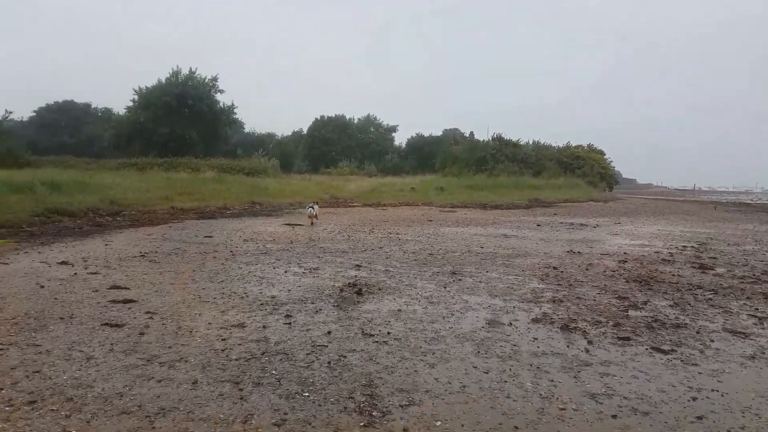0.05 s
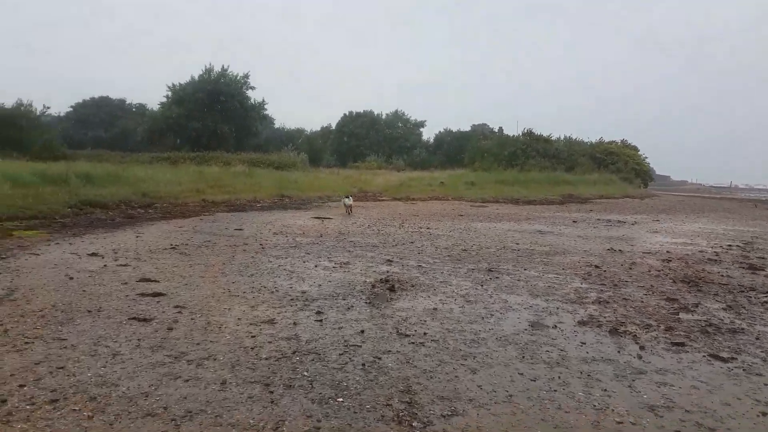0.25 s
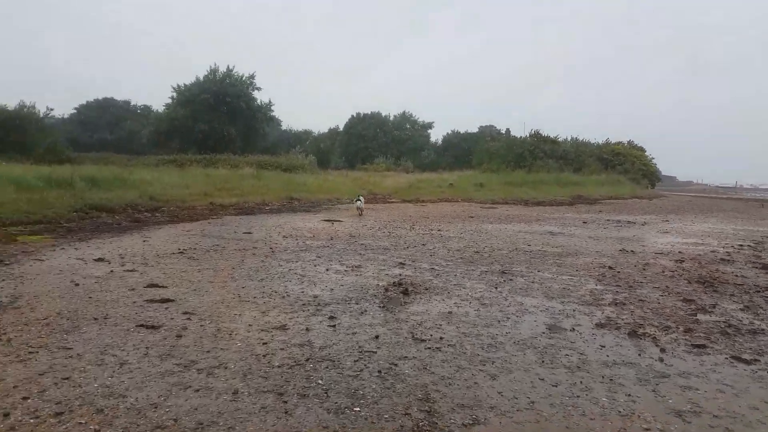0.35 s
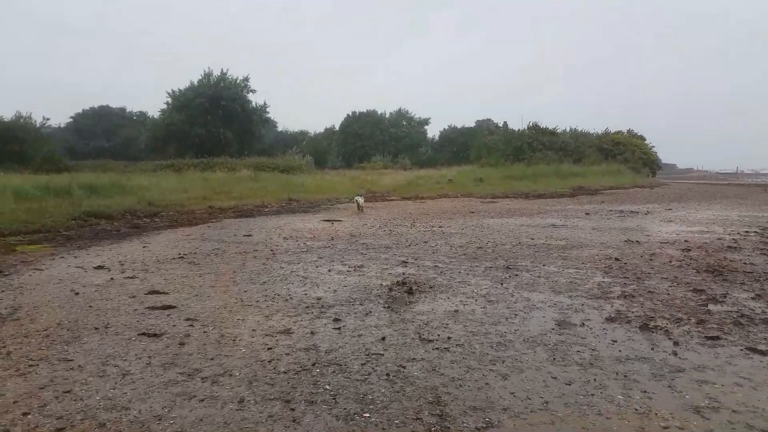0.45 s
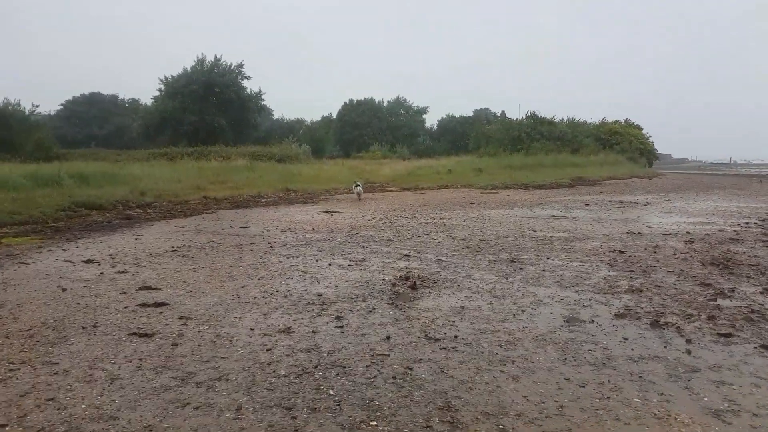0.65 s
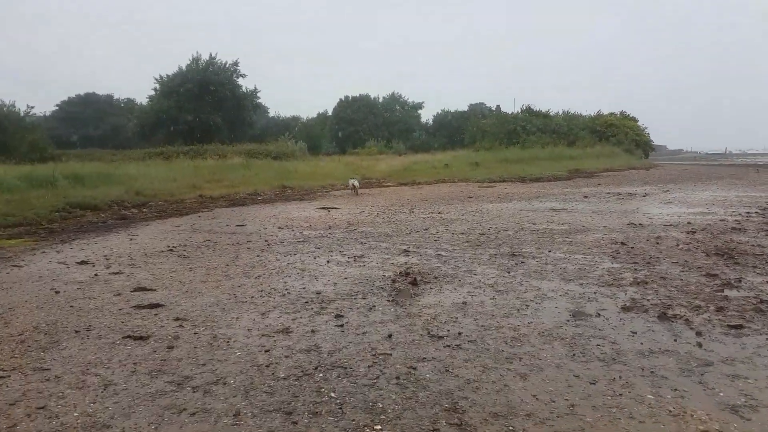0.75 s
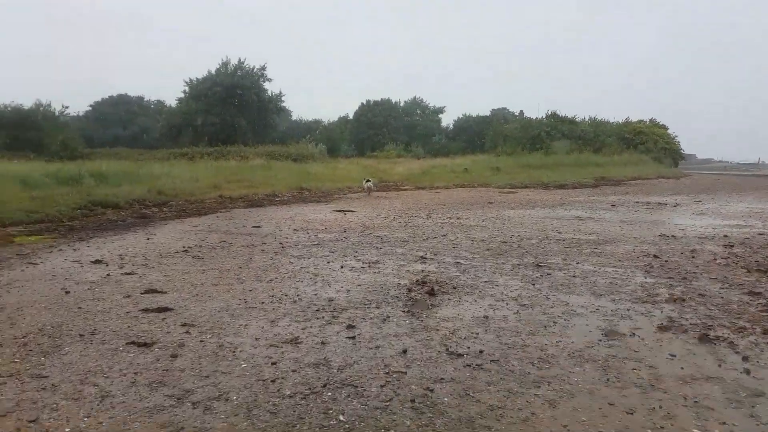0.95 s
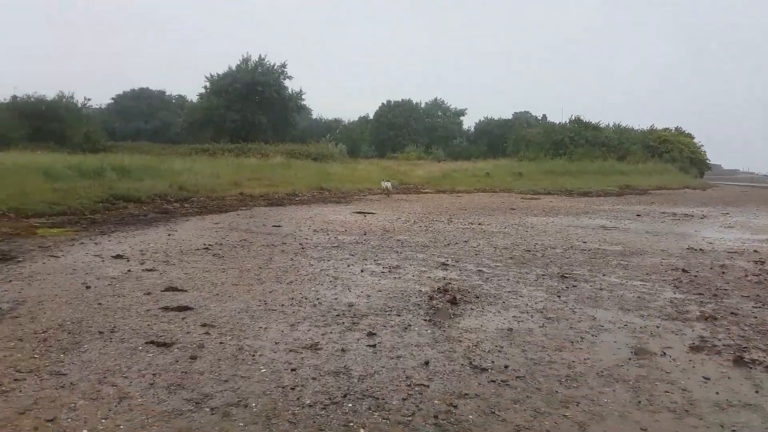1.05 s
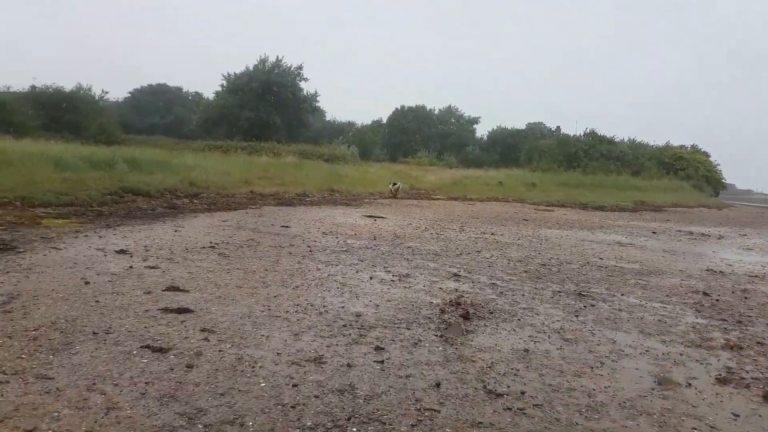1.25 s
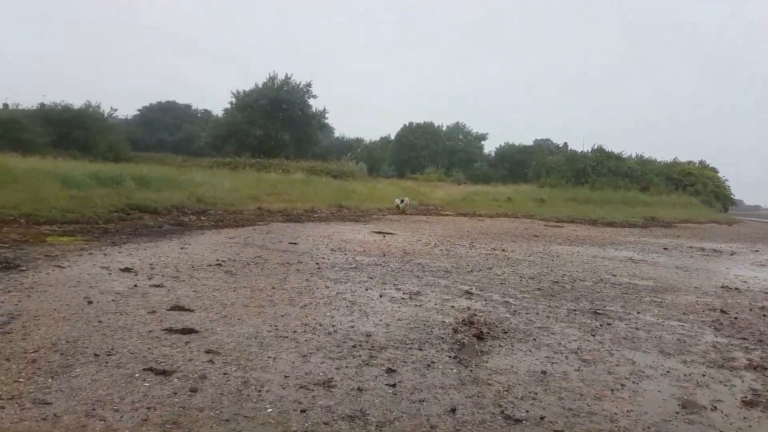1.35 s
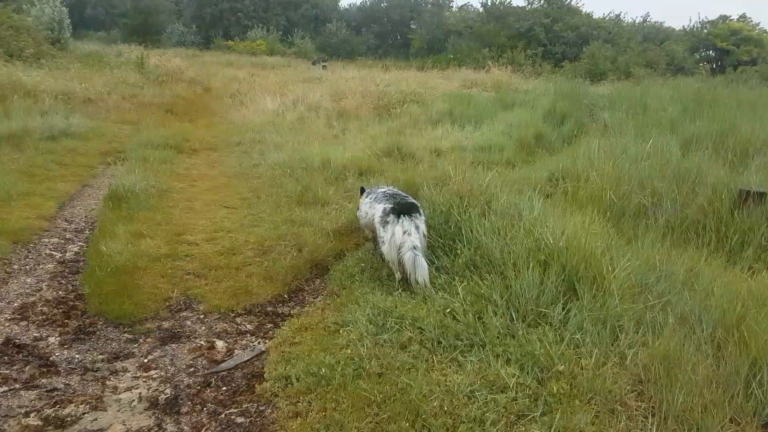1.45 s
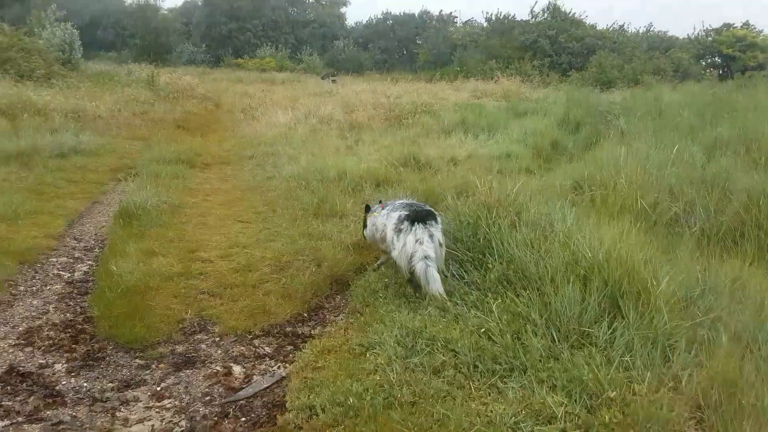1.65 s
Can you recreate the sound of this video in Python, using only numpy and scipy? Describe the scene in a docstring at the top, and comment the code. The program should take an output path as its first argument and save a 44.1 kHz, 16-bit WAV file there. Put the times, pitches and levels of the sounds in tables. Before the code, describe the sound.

Three footsteps crunch on wet, pebbly sand close to the microphone, the first loudest with a sharp stone clack. A hiss swells between the first two. Drops tick and light wind rumbles over the open shore's distant wash.

```python
"""Three footsteps crunch on wet, pebbly sand, close to a hand-held microphone on an open shore. Each step is a
run of short presses that set the sole, pebbles, small stones and wet grit ringing; single stones clack, hardest
in the first step. Drops tick nearby over a fine patter and a distant wash. A hiss swells and fizzes between the
first two steps. Light wind rumbles on the microphone, taps and buffets it; after the last step the low
background drops away abruptly as a short click sounds."""
import sys
import numpy as np
from scipy import signal
from scipy.io import wavfile

SR = 44100
rng = np.random.default_rng(int(sys.argv[2]) if len(sys.argv) > 2 else 0)


def generate_wav(signal):
    """Clip the signal to [-1, 1] and save it as 16-bit WAV at the path in sys.argv[1]."""
    frames = np.transpose(np.atleast_2d(signal))
    scaled = np.clip(frames, -1, 1) * 32767
    pcm = np.round(scaled).astype(np.int16)
    wavfile.write(sys.argv[1], SR, pcm)


N = 74970

# resonances of the ground, coarse to fine: (pitch [Hz], width [Hz], level [dB])
PEBBLE_MODES = [(796, 283, 0.004), (1252, 403, 0)]
STONE_MODES = [(1680, 1090, 0.5), (2750, 595, 4.5), (3510, 1170, -4), (4930, 1370, -5)]
GRIT_MODES = [(6430, 1400, -4.5), (9100, 280, 0.5), (11500, 6800, -7.5), (15500, 2000, -13)]


def from_db(db):
    """Decibels to gain."""
    return 10 ** (np.asarray(db) / 20)


def rms_one(x):
    """Scale to rms 1."""
    return x / np.sqrt(np.mean(x ** 2) + 1e-20)


def panned(db):
    """Stereo gains with the left louder by db."""
    return from_db(np.array([[db / 2], [-db / 2]]))


def level_curve(rows):
    """Gain over time from (time [s], level [dB]) points."""
    return from_db(np.interp(np.arange(N) / SR, *np.transpose(rows)))


def at_hz(rows, hz):
    """The columns of a table read at one frequency."""
    freqs, *columns = np.transpose(rows)
    return [np.interp(np.log(hz), np.log(freqs), c) for c in columns]


def drift(per_s):
    """A random wander through per_s points a second."""
    knots = rng.standard_normal(1000)
    return np.interp(np.arange(N) / SR * per_s, np.arange(len(knots)), knots)


def resonate(x, modes):
    """Ring parallel resonances with alternating signs."""
    out = 0
    for k, (hz, width, db) in enumerate(modes):
        r, w = np.exp(-np.pi * width / SR), 2 * np.pi * hz / SR
        ring = signal.lfilter([1, 0, -1], [1, -2 * r * np.cos(w), r * r], x + 1e-18)
        out = out + (-1) ** k * from_db(db) * (1 - r * r) / 2 * ring
    return out


def low_cut(x, hz):
    """Roll off the lows below hz."""
    return signal.sosfilt(signal.butter(4, hz, "high", fs=SR, output="sos"), x)


def grains(shape, per_s, spread_db=2.5):
    """Random clicks, many small and a few large."""
    sizes = from_db(spread_db * np.minimum(rng.exponential(1, shape), 4)) * rng.choice([-1, 1], shape)
    return sizes * (rng.random(shape) < per_s / SR)


def shower(hold_s, modes, cut_hz, width, per_s=6000):
    """Tiny contacts ring a body under a press-and-release envelope; width sets the stereo spread."""
    attack_s, decay_s = 0.0016, 0.0058
    t = np.arange(SR // 12) / SR
    press = np.minimum(t / attack_s, 1) * np.exp(-np.maximum(t - hold_s, 0) / decay_s)
    mid, side = low_cut(resonate(press * grains((2, len(t)), per_s), modes), cut_hz)
    return np.sqrt(np.mean(press ** 2)) * (rms_one(mid) + width * rms_one(side) * [[1], [-1]])


def banded_noise(spectrum, stereo, flicker_db, flicker_per_s):
    """Third-octave noise bands, each with its own level, flicker, stereo likeness and pan; rms 1."""
    out, edges = 0, np.geomspace(20, 17000, 30)
    white = rng.standard_normal((2, 2, N))
    shared_flicker = drift(flicker_per_s)
    for k, (low, high) in enumerate(zip(edges, edges[1:])):
        band = signal.butter(2, [low, high], "band", fs=SR, output="sos")
        mid, side = signal.sosfilt(band, white[k % 2])
        hz = np.sqrt(low * high)
        alike, pan_db = at_hz(stereo, hz)
        gain = from_db(at_hz(spectrum, hz)[0] + flicker_db * (shared_flicker + drift(flicker_per_s)))
        pair = np.sqrt(1 + alike) * mid + np.sqrt(1 - alike) * side * [[1], [-1]]
        out = out + gain * panned(pan_db) * pair
    return rms_one(out)


def add(out, s, sound):
    """Mix a short sound in at time s."""
    i = int(np.clip(s * SR, 0, N - 1))
    out[:, i:i + sound.shape[1]] += sound[:, :N - i]


def shore_wash():
    """The distant shore lays a steady bed of soft noise."""
    spectrum = [(40, -12.5), (800, -4.5), (1750, -3.5), (2400, -10.5), (3400, -7.5), (5000, -25),
                (8000, -28), (16000, -24)]  # tone: (frequency [Hz], relative density [dB])
    stereo = [(650, 0.86, -1), (1320, 0.0076, 0.5), (2100, 0, 14.5), (4360, 0, -1)]  # image: (frequency [Hz], likeness [0-1], left over right [dB])
    return from_db(-54.5) * banded_noise(spectrum, stereo, flicker_db=1.0, flicker_per_s=130)


def hiss():
    """A swishing hiss with fine crackle in it swells after the first step."""
    swell = [(0, -55.5), (.33, -56.5), (.41, -44), (.48, -48.5), (.70, -47.5), (.78, -54), (.96, -49.5),
             (1.08, -57.5), (1.44, -56.5), (1.5, -58), (1.7, -65)]  # envelope: (time [s], level [dB])
    spectrum = [(300, -12.5), (700, -2.5), (1200, -2.5), (1750, 3.5), (2600, -4.5), (4000, -5.5),
                (6000, -14), (7800, -52), (9400, -13), (15500, -24)]  # tone: (frequency [Hz], relative density [dB])
    stereo = [(600, 1, 0.33), (1460, 0.69, 5.8), (2920, 0.045, 6.2), (8000, 0.077, 2.2),
              (15000, 0.072, 11.6)]  # image: (frequency [Hz], likeness [0-1], left over right [dB])
    swish = banded_noise(spectrum, stereo, flicker_db=1.5, flicker_per_s=130)
    crackle = resonate(grains((2, N), per_s=640, spread_db=5), STONE_MODES + GRIT_MODES)
    return level_curve(swell) * (swish + from_db(-9.5) * rms_one(crackle))


def wind():
    """Wind on the microphone makes a lumpy rumble; near the end the low background drops away abruptly."""
    gusts = [(0, -52), (.2, -57), (.29, -52), (.7, -50), (.8, -56), (.89, -48), (.97, -54.5), (1.05, -48.5),
             (1.2, -50.5), (1.465, -46), (1.49, -70)]  # envelope: (time [s], level [dB])
    spectrum = [(25, -24), (55, 1), (90, -0.5), (160, -3.5), (300, -7), (600, -14.5), (4000, -76)]  # tone: (frequency [Hz], relative density [dB])
    stereo = [(60, 0.074, 10.1), (300, 0.11, 8.8)]  # image: (frequency [Hz], likeness [0-1], left over right [dB])
    return level_curve(gusts) * banded_noise(spectrum, stereo, flicker_db=1.45, flicker_per_s=66)


def crunches():
    """Each press sets off showers of contacts in sole, pebbles, stones and grit; light steps are duller."""
    # the sole presses down: (time [s], hold [s], thud [dB], pebbles [dB], stones [dB], grit [dB])
    presses = [ (.007, 0.0029, -57, -46, -57, -77), (0.2025, 0.009, -33.5, -36, -42, -51),
               (0.2155, 0.0057, -35.5, -39, -43.5, -50), (0.2259, 0.0029, -30, -38.5, -48, -46),
               (0.2305, 0.01, -38.5, -63, -47.5, -55), (0.2468, 0.0028, -33, -29, -30, -35.5),
               (0.2566, 0.011, -39.5, -36, -34.5, -43.5), (0.28, 0.002, -39.5, -43, -40, -50.5),
               (0.289, 0.024, -53, -56.5, -50.5, -57), (0.326, 0.0078, -46, -53, -46.5, -55.5),
               (0.365, 0.02, -42, -44, -54.5, -81), (0.869, 0.02, -47, -56, -59, -64),
               (0.8929, 0.005, -41, -40, -43.5, -35.5), (0.903, 0.0098, -46, -41, -48, -49.5),
               (0.922, 0.0049, -64, -50, -46.5, -46), (0.929, 0.0031, -37, -42.5, -45, -52),
               (1.311, 0.017, -57, -56, -55.5, -68), (1.423, 0.0043, -43, -42.5, -46, -59),
               (1.43, 0.004, -39, -42, -41.5, -49.5), (1.439, 0.015, -51, -44.5, -46, -52.5)]
    brightness = [(.3, 18000), (.9, 11900), (1.44, 14200)]  # top end of each step: (time [s], high cut [Hz])
    sole_modes = [(299, 147, -9), (400, 93, 0), (547, 190, -9)]  # thud of the sole: (pitch [Hz], width [Hz], level [dB])
    # grain of each layer, sole to grit: (contacts [1/s], low cut [Hz], stereo width [side/mid])
    textures = [(6070, 214, 0.085), (3880, 595, 0.11), (2110, 1240, 0.58), (16600, 3900, 0.82)]
    bodies = sole_modes, PEBBLE_MODES, STONE_MODES, GRIT_MODES
    out = np.zeros((2, N))
    for s, hold_s, *levels in presses:
        top_hz = np.interp(s, *np.transpose(brightness))
        dull = signal.butter(4, top_hz, fs=SR, output="sos")
        for db, modes, (per_s, cut_hz, width) in zip(levels, bodies, textures):
            add(out, s, from_db(db) * signal.sosfilt(dull, shower(hold_s, modes, cut_hz, width, per_s)))
    return out


def tick(pitch_ratio):
    """The short ring of one drop or click; peak 1."""
    modes = [(1630, 760, 4), (2740, 990, 0), (4200, 630, -13)]  # ring of a tick: (pitch [Hz], width [Hz], level [dB])
    tuned = [(hz * pitch_ratio, width, db) for hz, width, db in modes]
    ring = low_cut(resonate(signal.unit_impulse(SR // 50), tuned), hz=500)
    return ring / np.abs(ring).max()


def drops_and_click():
    """Near drops tick and splash over a random patter; a last short click sounds as the low rumble breaks off."""
    ticks = [(.029, -37.5), (0.0478, -42), (0.0907, -36), (0.1641, -27.5), (0.366, -34), (0.4987, -32),
             (0.5323, -29.5), (0.6395, -31.5), (0.8244, -32), (1.113, -35.5), (1.2075, -35.5), (1.240, -39),
             (1.4108, -26.5), (1.467, -33)]  # near drops, then the last click: (time [s], level [dB])
    out = np.zeros((2, N))
    for s, db in ticks:
        gain = from_db(db) * panned(4.5)
        pitch_ratio = from_db(0.87 * rng.normal())  # about 10 % spread
        splash = shower(0, PEBBLE_MODES + STONE_MODES, cut_hz=310, width=1.0)
        add(out, s, gain * tick(pitch_ratio))
        add(out, s, gain * from_db(-24) * splash)
    patter = np.convolve(grains(N, per_s=380, spread_db=5), tick(0.94))[:N]
    return out + from_db(-64) * panned(16) * rms_one(patter)


def knocks():
    """Stones clack, the heel thumps, and wind taps faintly on the microphone; each rings briefly."""
    # stone clacks, heel thumps and wind taps: (time [s], pitch [Hz], peak [dB], 60 dB decay [s])
    hits = [(.217, 4480, -26, .002), (.2268, 4000, -30, 0.0035), (0.2489, 2528, -10, 0.011),
            (0.2491, 327, -18, 0.013), (0.871, 804, -38, 0.015), (.8882, 3580, -35, 0.014),
            (.898, 391, -25.5, .048), (.928, 2600, -34, 0.0085), (0.935, 1210, -35.5, 0.024),
            (1.1492, 597, -40, 0.0052), (1.2919, 640, -39, 0.004), (1.3128, 1700, -39, 0.0066),
            (1.3675, 587, -41, 0.0043), (1.3801, 3400, -38.5, .002), (1.4319, 2290, -28, 0.011),
            (1.4349, 1110, -19.5, 0.0046), (1.4346, 211, -33, 0.02)]
    rise_s, overtone_ratio, overtone_db = 0.00063, 1.38, -16
    out, t = np.zeros((2, N)), np.arange(SR // 10) / SR
    for s, hz, db, t60 in hits:
        phase = 2 * np.pi * hz * t
        modes = np.sin(phase) + from_db(overtone_db) * np.sin(overtone_ratio * phase)
        envelope = np.exp(-np.log(1000) * t / t60) * (1 - np.exp(-(t / rise_s) ** 2))
        ring = low_cut(modes * envelope, hz=208)
        add(out, s, from_db(db) * ring[None] / np.abs(ring).max())
    return out


def fizz():
    """Tiny bright grains sparkle on top of the hiss between the first two steps."""
    swell = [(.44, -95), (.51, -56.5), (.71, -57), (.80, -70)]  # envelope: (time [s], level [dB])
    sparks = resonate(grains((2, N), per_s=3000), GRIT_MODES)
    return level_curve(swell) * rms_one(low_cut(sparks, hz=8500)) * panned(7.5)


def buffets():
    """Gusts hit the microphone from the left in short, dull flutters."""
    gusts = [(1.002, 0.015, -51), (1.312, 0.0078, -41.5)]  # puffs of wind: (time [s], hold [s], level [dB])
    boom = [(159, 108, 0)]  # their low resonance: (pitch [Hz], width [Hz], level [dB])
    out = np.zeros((2, N))
    for s, hold_s, db in gusts:
        add(out, s, from_db(db) * panned(17.5) * shower(hold_s, boom, cut_hz=100, width=0.46))
    return signal.sosfilt(signal.butter(2, 1110, fs=SR, output="sos"), out + 1e-18)


def scene():
    """Steps, drops and air in the open, with no echo."""
    return crunches() + knocks() + drops_and_click() + buffets() + shore_wash() + hiss() + wind() + fizz()


def record(dry):
    """A steep high cut at 16.1 kHz."""
    return signal.sosfilt(signal.ellip(12, .1, 80, 16100, fs=SR, output="sos"), dry)


dry = scene()
out = record(dry)
generate_wav(out)
```